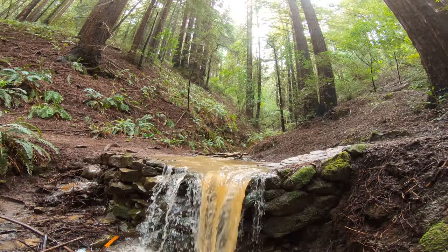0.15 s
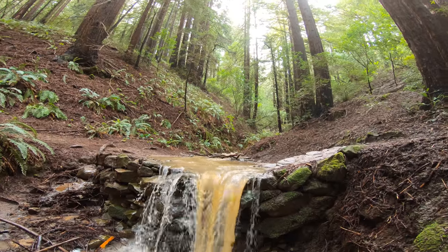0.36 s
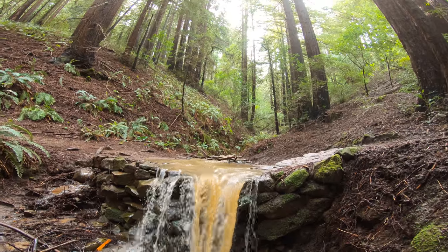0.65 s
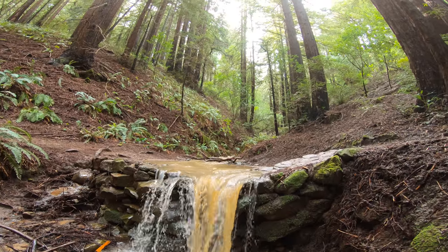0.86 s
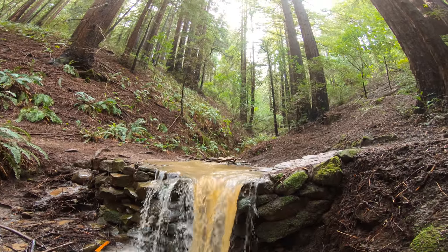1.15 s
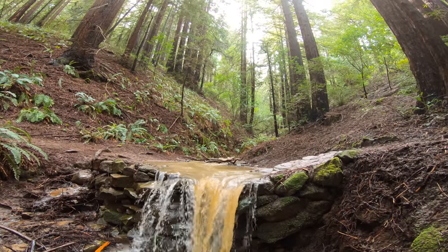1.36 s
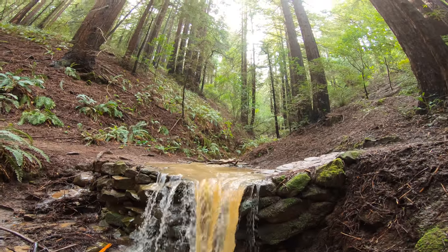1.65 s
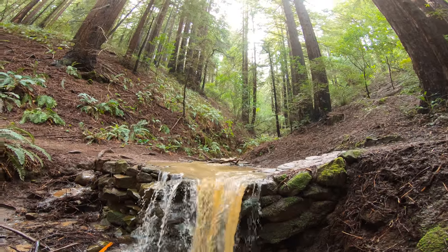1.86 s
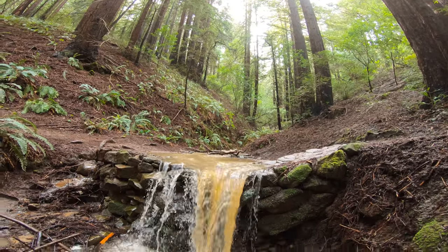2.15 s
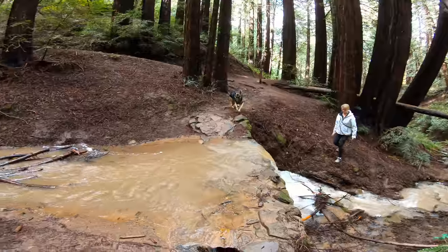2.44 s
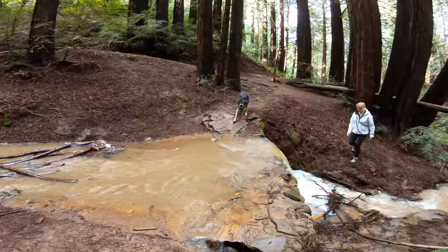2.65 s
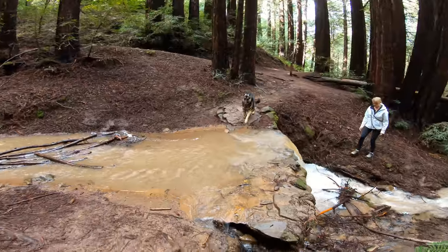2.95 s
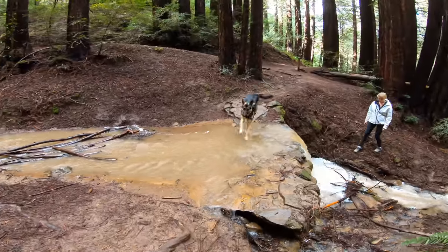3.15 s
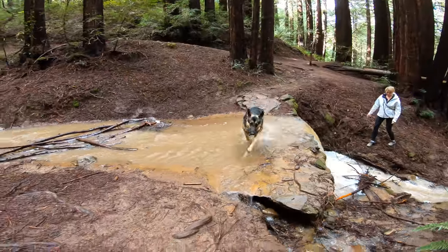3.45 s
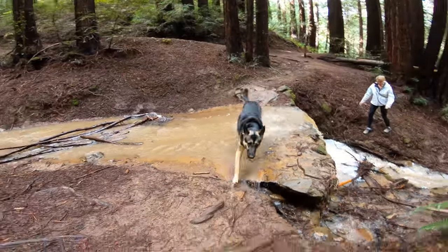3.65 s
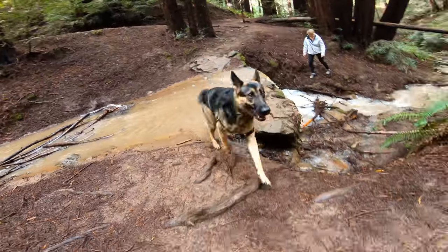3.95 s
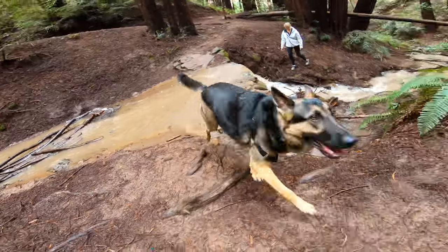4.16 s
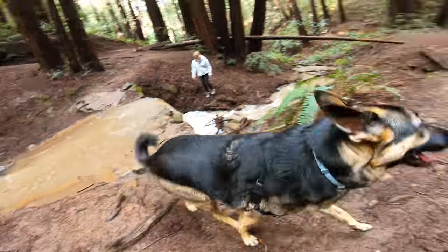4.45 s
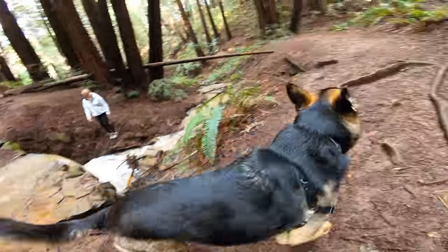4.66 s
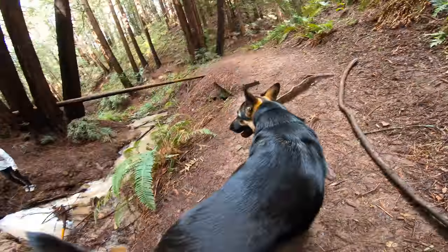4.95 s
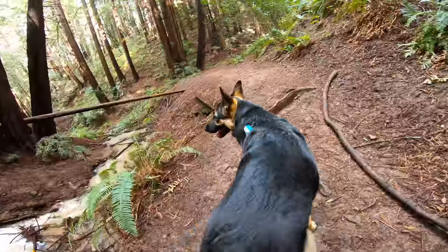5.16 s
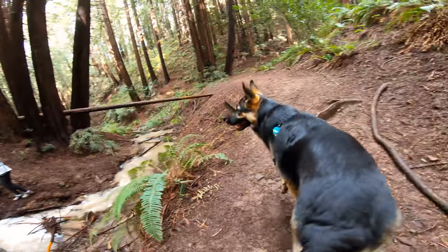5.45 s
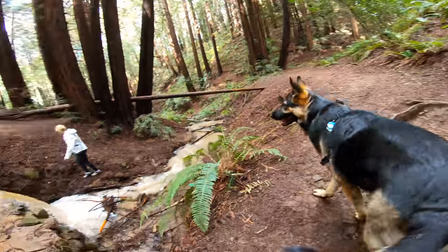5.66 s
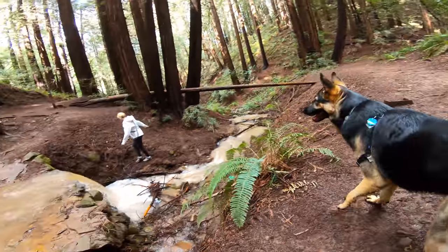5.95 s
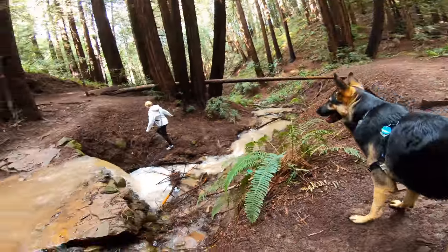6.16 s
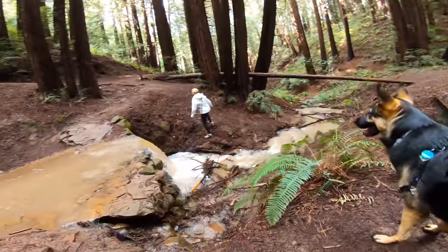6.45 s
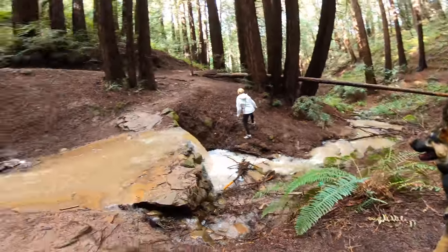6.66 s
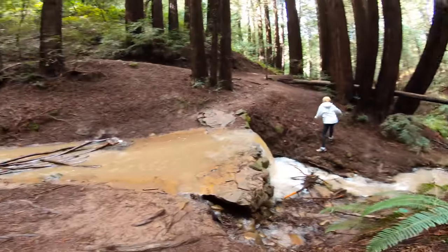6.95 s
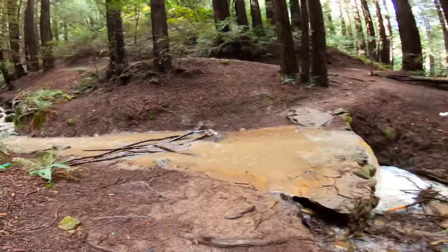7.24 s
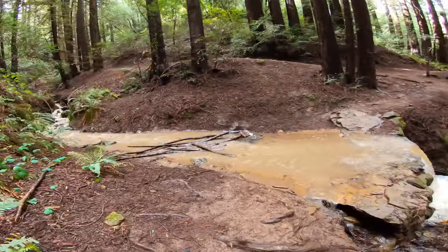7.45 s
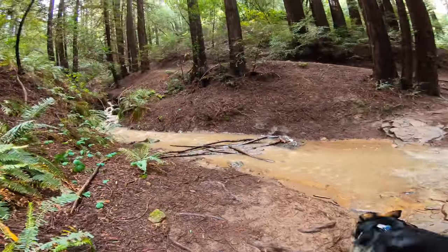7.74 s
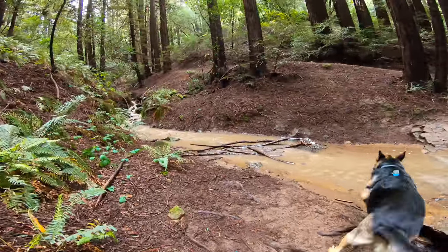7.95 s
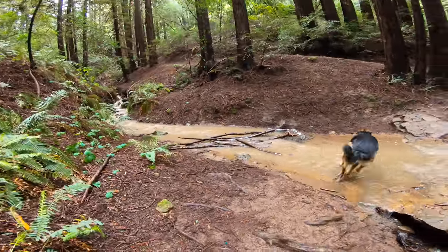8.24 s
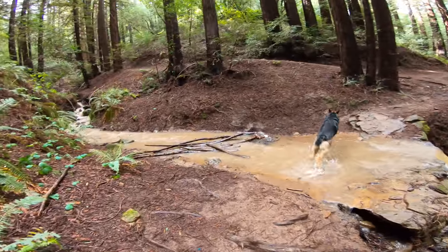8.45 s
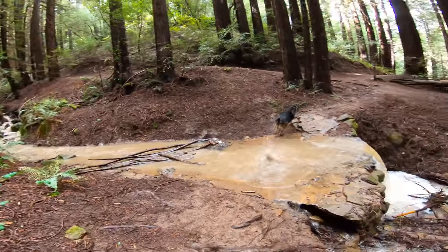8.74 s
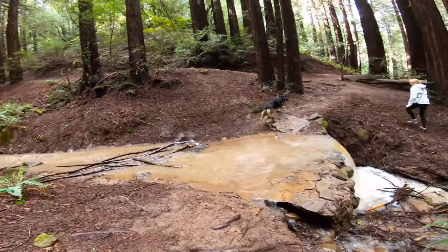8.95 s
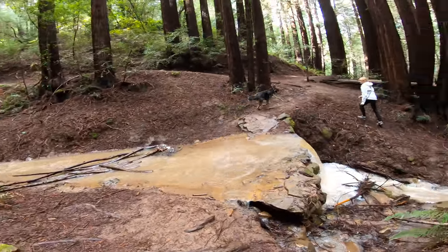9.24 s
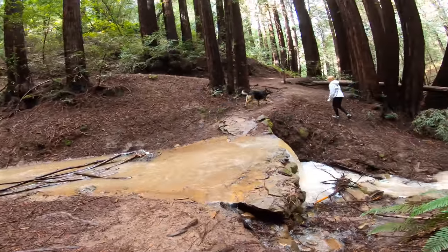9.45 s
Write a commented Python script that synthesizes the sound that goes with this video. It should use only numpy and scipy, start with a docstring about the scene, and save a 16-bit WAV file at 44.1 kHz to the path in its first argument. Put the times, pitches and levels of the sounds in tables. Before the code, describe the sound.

A loud close waterfall roars and thumps, then cuts abruptly to a quieter stream as a dog splashes and thuds past, collar tags tinkling.

```python
"""Runoff falls over a rock ledge, heard first close below the fall, then from the trail above it.
The fall is banded, grainy noise with ringing air pockets; below, slugs of water add low thumps.
On the trail the listener turns about, so its boom, wash and spray swell and fade.
A dog's paws splash (short noise bursts) and thud (low rings); its collar tags tinkle as struck modes."""
import sys
import numpy as np
from scipy import signal
from scipy.fft import next_fast_len
from scipy.io import wavfile

SR = 44100
rng = np.random.default_rng(int(sys.argv[2]) if len(sys.argv) > 2 else 0)


def digitize_waveform(pressure):
    """Quantize a signal to 16-bit integers and store it at the path in sys.argv[1].

    Rows of a 2-D input are taken as channels; values are limited to [-1, 1].
    """
    field = np.atleast_2d(pressure).T
    bounded = np.clip(field, -1, 1)
    quanta = np.round(bounded * 32767).astype(np.int16)
    wavfile.write(sys.argv[1], SR, quanta)


N = 423349

MOVE_S = 2.402   # the listening place changes at once
BELOW_DB, ABOVE_DB = -22, -34.5   # level of the fall in each place
WIDE_ABOVE_HZ = 11800   # on the trail only bands above this differ between the sides
RIDGE_OCTAVES = 0.087   # spread of the bright ridge
GURGLE_S, GURGLE_RISE_S, GURGLE_HOLD_S, GURGLE_FALL_S = 2.42, 0.07, 0.343, 0.06
GURGLE_DB, MUTTER_DB = -40, -67   # small air pockets during the gurgle, and otherwise
GLANCING_SPREAD_DB = 3
SPLASH_LOW_HZ, SPLASH_HIGH_HZ = 3030, 6840
CUTOFF_HZ = 15700
RUN_IN = 4000   # samples that let the filters settle
BAND_ORDER = 3

# Tags on the collar, one mode a row: (pitch [Hz], usual level under a glancing blow [dB], t60 [s])
TAG_MODES = [(4600, 1, .03), (6000, -2, .03), (8500, -12, .06), (10000, -8.5, 0.038), (13150, -12, .06),
             (13650, -6, .045), (14900, -12, .03)]
# Clinks of the tags: (time [s], level [dB], pitch of the mode struck squarely [Hz])
CLINKS = [(3.893, -70, 10000), (4.081, -57, 10000), (4.255, -60, 10000), (4.358, -61, 10000),
          (7.564, -51, 13650), (7.769, -46, 13650), (7.816, -54, 13650), (7.849, -49, 10000),
          (7.869, -52, 8500), (8.010, -56, 13650), (8.028, -53, 10000), (8.093, -56, 13650),
          (8.120, -58, 13150), (8.135, -53, 13150), (8.202, -62, 10000), (8.375, -64, 13650)]
# Paws in water: (time [s], relative level [dB], t60 [s])
SPLASHES = [(2.668, -35, .05), (3.200, -39, .05), (3.265, -34, .03), (3.399, -33, .09), (3.545, -33, .15),
            (3.619, -44, .05), (3.736, -25, 0.027), (3.935, -27, .04), (5.066, -32, 0.21),
            (5.885, -33, .05), (6.247, -25.5, .05), (7.687, -33, 0.036), (7.767, -30, .05),
            (7.959, -34, .05), (8.188, -30, 0.049), (8.303, -34, .15), (8.334, -31.5, 0.1),
            (8.389, -47, 0.091), (8.519, -33, 0.063), (9.204, -30.5, 0.057)]
# Paws on the ground: (time [s], relative level [dB], pitch [Hz])
THUDS = [(2.611, -25, 205), (3.739, -21.5, 194), (3.780, -21, 191), (3.820, -24, 200), (3.832, -20, 207),
         (3.873, -19, 202), (3.947, -20, 170), (3.969, -30.5, 180), (4.108, -21.5, 190), (4.799, -30, 240),
         (5.797, -22.5, 261), (9.315, -30, 159)]
# Tone of the fall from below: (pitch [Hz], relative density [dB per Hz])
BELOW_COLOUR = [(25, -36), (75, 1), (140, -1), (200, -2), (280, -15.5), (410, -8), (560, -19.5), (740, -14),
                (1100, -22.5), (1800, -20.5), (4700, -30), (6600, -24), (8400, -32), (11000, -44),
                (13500, -46), (15600, -54)]
# Stereo width from below: (pitch [Hz], left-right likeness [0-1])
LIKENESS = [(60, 0.97), (110, 1), (200, 1), (380, 1), (700, 0.87), (1290, 0.52), (2380, 0.67), (4400, 0.9),
            (8120, 0.04), (15000, 0.03)]
# Stereo balance from below: (pitch [Hz], left minus right [dB])
LEAN = [(60, -5), (110, -0.5), (200, -3), (380, -4), (700, -7.5), (1290, -6.5), (2380, -3), (4400, -0.5),
        (8120, -4), (15000, 2)]
# Stereo phase from below: (pitch [Hz], lead of the left side [rad])
LEAD = [(500, -0.07), (1640, 0.35), (3000, 0.7), (5000, -1.1), (7000, -0.9)]
# Slugs of water thumping into the pool: (time [s], relative level [dB], pitch [Hz])
SLUGS = [(0.069, -14, 137), (0.139, -8, 198), (0.309, -17, 91.5), (0.45, -10.5, 118), (0.491, -6.5, 198),
         (0.669, -9, 127), (0.754, -28, 118), (0.92, -8.5, 144), (1.1, -15, 104), (1.261, -14, 184),
         (1.328, -15, 118), (1.485, -16.5, 116), (1.661, -19, 116), (1.954, -17, 105), (2.216, -10, 127)]
# Tone of the fall from the trail, hollow near 3 and 11 kHz: (pitch [Hz], relative density [dB per Hz])
ABOVE_COLOUR = [(25, -21), (64, -3.5), (120, -5.5), (190, 0.5), (260, -4.5), (340, -13), (750, -15.5),
                (950, -20), (1900, -21), (2300, -28.5), (3450, -35.5), (4050, -27), (6300, -27.5),
                (8000, -39), (11400, -56), (12600, -47.5), (15600, -49)]
# A bright ridge in the spray glides down as the listener turns: (time [s], centre [Hz], strength [dB])
RIDGE = [(4.5, 6460, 3.5), (4.8, 6400, 4), (5.7, 6200, 4.5), (6.4, 5300, 4), (6.9, 4700, 5),
         (7.2, 4500, 2.5)]
# Swings of the deepest bass on the trail: (time [s], level [dB])
RUMBLE = [(2.45, -36.5), (2.95, -43.5), (3.44, -45.5), (3.76, -39), (4.12, -49.5), (5.57, -49), (5.76, -61),
          (6.04, -47), (6.24, -43.5), (8.23, -54.5), (8.92, -44), (9.58, -41.5)]
# Swings of the pool's boom, which its air pockets follow too: (time [s], level [dB])
BOOM = [(2.45, -41.5), (2.65, -39.5), (2.85, -43), (3.35, -43.5), (3.85, -38.5), (4.0, -43.5), (4.65, -42),
        (4.9, -33), (5.16, -31.5), (5.24, -40), (5.75, -40), (6.0, -34.5), (6.95, -33.5), (7.3, -42),
        (7.8, -41.5), (8.35, -34.5), (8.8, -35.5), (9.25, -33.5), (9.58, -34.5)]
# Swings of the fall as the listener turns: (time [s], level of the wash [dB], level of the spray [dB])
WASH_AND_SPRAY = [(2.45, -49.5, -51.5), (2.87, -50, -51), (3.6, -48.5, -47.5), (3.98, -52.5, -52.5),
                  (4.3, -52, -52.5), (4.61, -48.5, -50.5), (4.97, -45, -51), (5.53, -44, -48.5),
                  (5.92, -45.5, -46.5), (6.54, -46, -46), (6.94, -47, -46.5), (7.26, -50, -50.5),
                  (7.79, -51.5, -52.5), (8.56, -48.5, -47), (8.92, -50.5, -49), (9.58, -48.5, -46.5)]
# Swings of the highest treble on the trail: (time [s], level [dB])
AIR = [(2.45, -74), (2.57, -74), (2.79, -86), (3.06, -85), (3.76, -80), (4.28, -87), (5.27, -72.5),
       (6.56, -66.5), (7.38, -72), (8.7, -66.5), (9.58, -69.5)]
# How far each pitch follows those swings:
# (pitch [Hz], share of rumble [1], of boom [1], of wash [1], of spray [1], of air [1])
FOLLOWS = [(69.5, 1.07, -0.097, -0.053, -0.064, .01), (200, -0.088, 1.15, -0.27, 0.22, .01),
           (383, -0.54, 0.57, .3, -0.91, .01), (565, 0.25, 0.23, -0.19, 1.1, 0.057),
           (900, -0.12, -0.13, 0.23, 0.83, 0.11), (1700, 0.088, -0.029, 0.73, 0.061, 0.072),
           (3150, -0.084, -0.14, 0.88, 0.29, .01), (4500, 0.17, -0.22, -0.14, 0.92, .01),
           (6100, 0.055, 0.027, -0.22, 0.83, .01), (9200, 0.17, -0.072, 1.5, 0.41, .01),
           (12900, -0.16, 0.084, -0.053, -0.052, 0.81)]


def from_db(db):
    """Gain of a level in dB."""
    return 10 ** (np.asarray(db) / 20)


def rms_one(x):
    """Scaled to rms 1."""
    return x / np.sqrt(np.mean(x ** 2) + 1e-20)


def at_hz(points, hz):
    """A table read on a log-frequency axis."""
    table = np.array(points)
    return np.interp(np.log(hz), np.log(table[:, 0]), table[:, 1])


def drift(rate, size):
    """Slow chance with spread 1, one value for every 20th sample: noise through a two-pole lowpass."""
    r = np.exp(-40 * np.pi * rate / SR)
    slow = signal.lfilter([1], [1, -2 * r, r * r], rng.standard_normal(size + 4000))[4000:]
    return rms_one(slow - slow.mean())


def ring(clicks, hz, t60):
    """A unit click sets a dying sine of starting height 1 ringing in a two-pole resonator."""
    r = from_db(-60 / (t60 * SR))
    w = 2 * np.pi * hz / SR
    return signal.lfilter([0, np.sin(w)], [1, -2 * r * np.cos(w), r * r], clicks + 1e-18)


def thumps(events, size, t60, offset_db, knock_hz, knock_db):
    """Short dull blows: a low ring with a higher, softer knock on top, dying twice as fast."""
    out = np.zeros(size + SR)
    after = np.arange(SR // 5) / SR
    fade_db = -60 * after / t60
    knock = from_db(knock_db + fade_db) * np.sin(2 * np.pi * knock_hz * after)
    for s, db, hz in events:
        blow = np.sin(2 * np.pi * hz * after) + knock
        out[round(s * SR):][:len(after)] += blow * from_db(db + offset_db + fade_db)
    return out[:size]


def impacts(size, count, grain_db):
    """Drops land densely with uneven sizes: white, but grainy; all channels share the sizes."""
    sizes = from_db(grain_db * np.minimum(rng.exponential(1, size), 6))
    return rms_one(sizes) * rng.standard_normal((count, size))


def collar():
    """Each clink strikes one tag mode squarely and the others a glancing blow of uneven strength."""
    s, db, square_hz = np.transpose(CLINKS)
    out = np.zeros(N)
    chance = rng.standard_normal((len(s), len(TAG_MODES)))
    mode_hz = np.array(TAG_MODES)[:, 0]
    struck = np.argmin(np.abs(square_hz[:, None] - mode_hz), axis=1)
    for k, (hz, usual_db, t60) in enumerate(TAG_MODES):
        glancing_db = usual_db + GLANCING_SPREAD_DB * chance[:, k]
        clicks = np.zeros(N)
        clicks[np.round(s * SR).astype(int)] = from_db(db + (struck != k) * glancing_db)
        out += ring(clicks, hz, t60)
    return out


def paws():
    """Splashes are bright grains that die fast; steps on soil are short dull rings."""
    loudness = np.zeros(N)
    after = np.arange(SR // 5) / SR
    for s, db, t60 in SPLASHES:
        loudness[round(s * SR):][:len(after)] += from_db(db - 13 - 60 * after / t60)
    spray = impacts(N, count=1, grain_db=2.5)[0] * loudness
    bright = signal.butter(BAND_ORDER, [SPLASH_LOW_HZ, SPLASH_HIGH_HZ], "band", fs=SR, output="sos")
    spray = from_db(8.5) * signal.sosfilt(bright, spray + 1e-18)
    return spray + thumps(THUDS, N, t60=0.051, offset_db=-2, knock_hz=450, knock_db=-3.5)


def bands(drops, times, colour, swell_db, surge_db, own_db):
    """Yields narrow bands of the impacts, with slow swells, shared surges and own flicker."""
    coarse = times[::20]
    surge = surge_db * (0.58 * drift(9.0, len(coarse)) + 0.52 * drift(21, len(coarse)))
    edges = np.r_[np.geomspace(24, 2400, num=21), np.geomspace(2400, 16500, num=17)[1:]]
    for k, (low, high) in enumerate(zip(edges, edges[1:])):
        hz = np.sqrt(low * high)
        bright = np.clip(np.log2(hz / 300) / 5.0, 0.3, 1)   # surges show most in the spray
        flicker = own_db * drift(11.8, len(coarse))
        gain = from_db(at_hz(colour, hz) + swell_db(hz) + bright * surge + flicker)
        narrow = signal.butter(BAND_ORDER, [low, high], "band", fs=SR, output="sos")
        band = signal.sosfilt(narrow, drops(k, hz))[..., RUN_IN:]
        yield hz, np.interp(times, coarse, gain) * band


def bubbles(size, per_s, low_hz, high_hz, cycles):
    """Trapped air pockets ring a few cycles at random moments, on eight pitches; rms 1."""
    sizes = from_db(3.9 * np.minimum(rng.exponential(1, size), 4)) * rng.choice([-1, 1], size)
    born = rng.random(size) < per_s / SR
    dealt = rng.integers(0, 8, size)   # which pitch each pocket gets
    pitches = np.geomspace(low_hz, high_hz, num=8)
    return rms_one(sum(ring(sizes * born * (dealt == k), hz, cycles / hz)
                       for k, hz in enumerate(pitches)))


def swing(coarse, curve):
    """Each column of a level curve about its mean, in dB."""
    s, *levels = np.transpose(curve)
    return [np.interp(coarse, s, db) - np.mean(db) for db in levels]


def turning(coarse):
    """Swell of any pitch as the listener turns: its shares of the five swings."""
    curves = RUMBLE, BOOM, WASH_AND_SPRAY, AIR
    swings = np.array([level for curve in curves for level in swing(coarse, curve)])
    at, *shares = np.transpose(FOLLOWS)
    return lambda hz: np.array([at_hz(np.c_[at, share], hz) for share in shares]) @ swings


def fall_from_above():
    """Shaded by the ledge: quieter, centred, with a hollow boom from the plunge pool."""
    start = round(MOVE_S * SR)
    times = np.arange(start, N) / SR
    size = len(times)
    centre = impacts(size + RUN_IN, count=2, grain_db=3.0)
    air = impacts(size + RUN_IN, count=4, grain_db=4.0)
    turn_s, *ridge = np.transpose(RIDGE)
    ridge_hz, strength_db = (np.interp(times, turn_s, column) for column in ridge)

    def drops(k, hz):
        """Neighbouring bands take different drops; the highest are a left-right pair."""
        return air[k % 2::2] if hz > WIDE_ABOVE_HZ else centre[k % 2]

    out = np.zeros((2, size))
    for hz, band in bands(drops, times, ABOVE_COLOUR, turning(times[::20]), surge_db=1.17, own_db=1.16):
        if 3800 < hz < 8000:
            nearness = np.exp(-0.5 * (np.log2(hz / ridge_hz) / RIDGE_OCTAVES) ** 2)
            band = band * from_db(strength_db * (nearness + 0.1))
        out += band
    s, boom_db = np.transpose(BOOM)
    boom_gain = from_db(np.interp(times, s, boom_db) - 6.5)
    pockets = boom_gain * bubbles(size, 56, 148, 284, cycles=7.1)
    corners = np.cumsum([GURGLE_S, GURGLE_RISE_S, GURGLE_HOLD_S, GURGLE_FALL_S])
    gurgle_db = np.interp(times, corners, [MUTTER_DB, GURGLE_DB, GURGLE_DB, MUTTER_DB])
    pockets += from_db(gurgle_db) * bubbles(size, 300, 476, 593, cycles=18.0)
    return np.pad(from_db(ABOVE_DB) * rms_one(out) + pockets, [(0, 0), (start, 0)])


def fall_from_below():
    """Wide, loud roar; likeness, lean and phase lead between the sides vary with pitch."""
    size = round(MOVE_S * SR)
    left, apart = impacts(size + RUN_IN, count=4, grain_db=3.0).reshape(2, 2, -1)
    # the same drops a quarter cycle late
    turned = signal.hilbert(left, next_fast_len(size + RUN_IN))[:, :size + RUN_IN].imag
    drops = np.stack([left, turned, apart], axis=1)
    out = 0
    for hz, (same, quarter, other) in bands(lambda k, hz: drops[k % 2], np.arange(size) / SR, BELOW_COLOUR,
                                            lambda hz: 0, surge_db=0.92, own_db=0.97):
        alike = np.clip(at_hz(LIKENESS, hz), 0, 1)
        lead = at_hz(LEAD, hz)
        shared = np.cos(lead) * same + np.sin(lead) * quarter
        right = alike * shared + np.sqrt(1 - alike ** 2) * other
        out = out + from_db(at_hz(LEAN, hz) * np.array([[0.5], [-0.5]])) * [same, right]
    pockets = from_db(-9) * bubbles(size, 80, 93, 444, cycles=5.8)
    pockets = pockets + from_db(-23.5) * bubbles(size, 60, 690, 3040, cycles=22.0)
    out = from_db(BELOW_DB) * (rms_one(out) + pockets * from_db([[-1.2], [1.2]]))
    slugs = thumps(SLUGS, size, t60=0.09, offset_db=-2, knock_hz=397, knock_db=-9.5)
    out += slugs * from_db([[-1.1], [1.1]])
    fade_out = np.clip(np.arange(size)[::-1] / (0.003 * SR), 0, 1)   # over 3 ms
    return np.pad(out * fade_out, [(0, 0), (0, N - size)])


def scene():
    """The dog, and the fall from two places."""
    return collar() + paws() + fall_from_above() + fall_from_below()


def record(dry):
    """The microphone loses the deepest bass; the top is cut."""
    dry = signal.sosfilt(signal.butter(2, 32.0, "high", fs=SR, output="sos"), dry)
    return signal.sosfilt(signal.ellip(12, 0.5, 60, CUTOFF_HZ, fs=SR, output="sos"), dry)


dry = scene()
out = record(dry)
digitize_waveform(out)
```